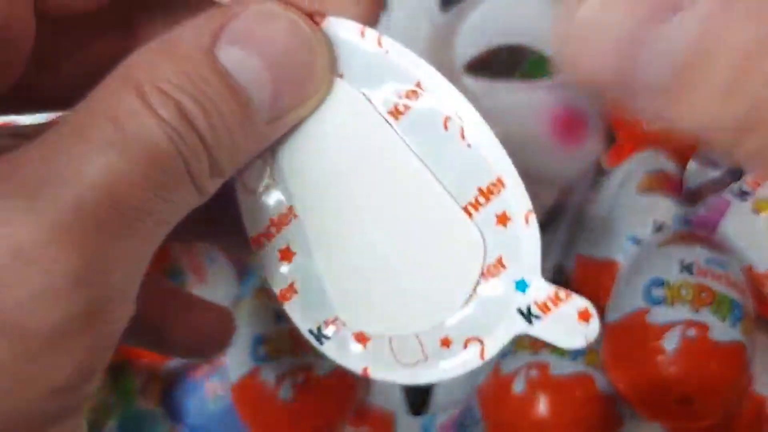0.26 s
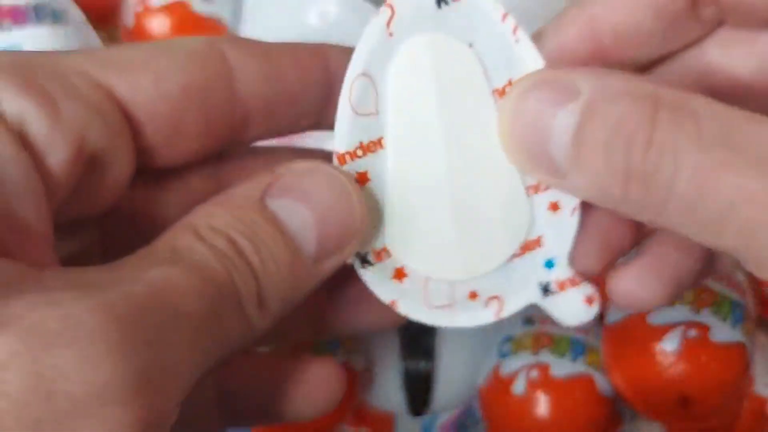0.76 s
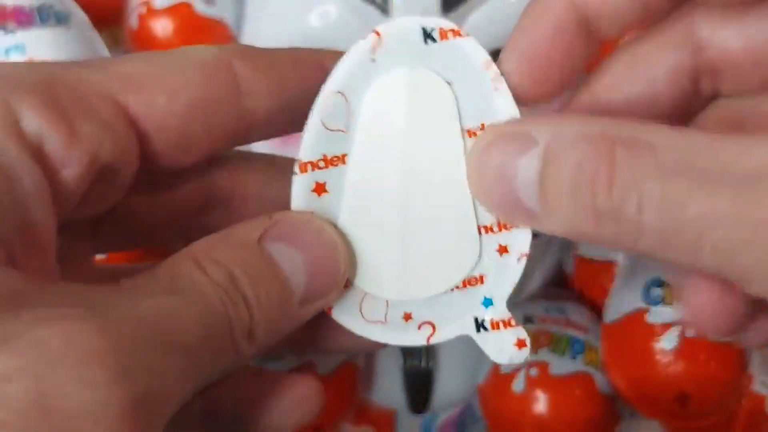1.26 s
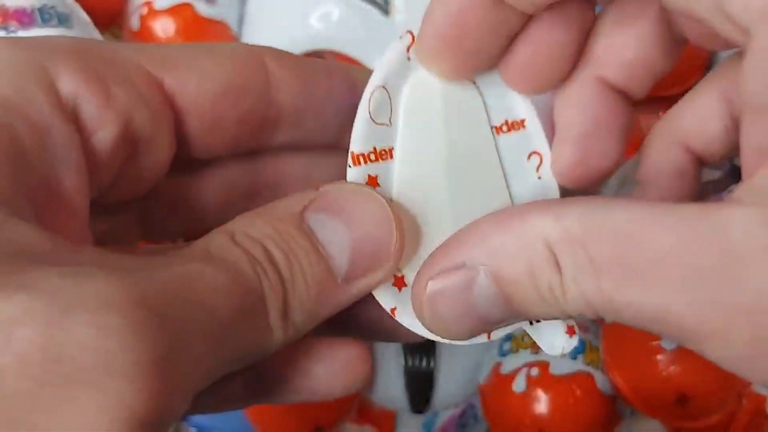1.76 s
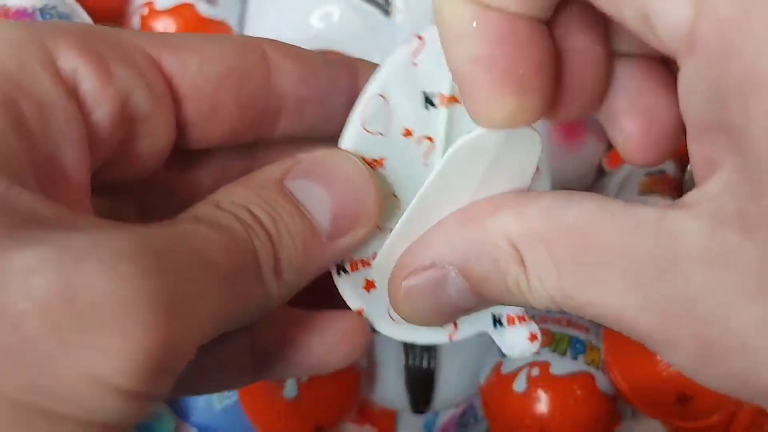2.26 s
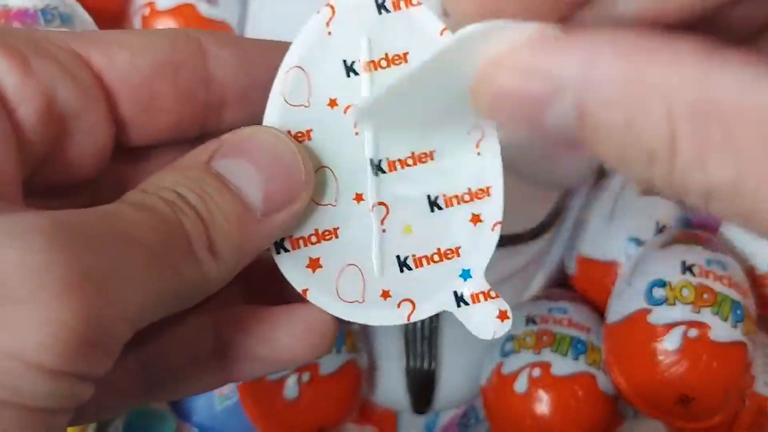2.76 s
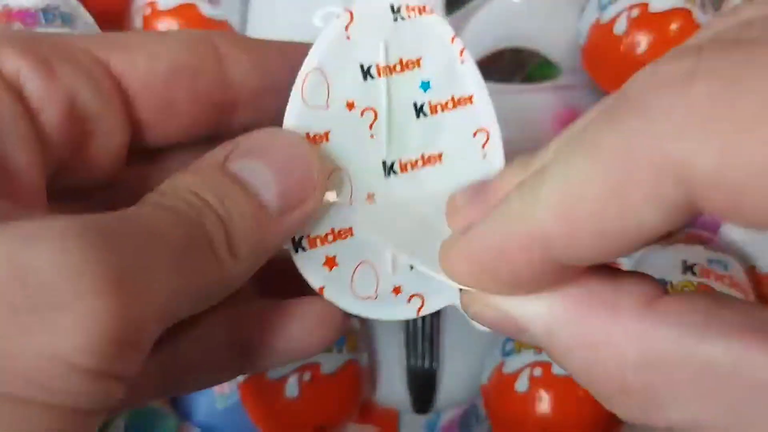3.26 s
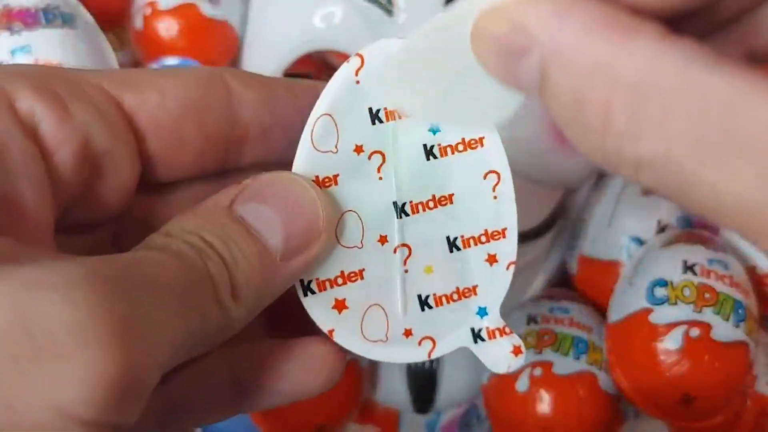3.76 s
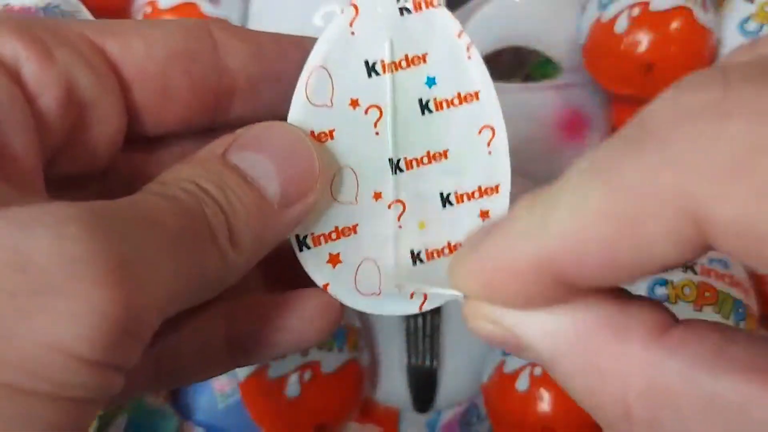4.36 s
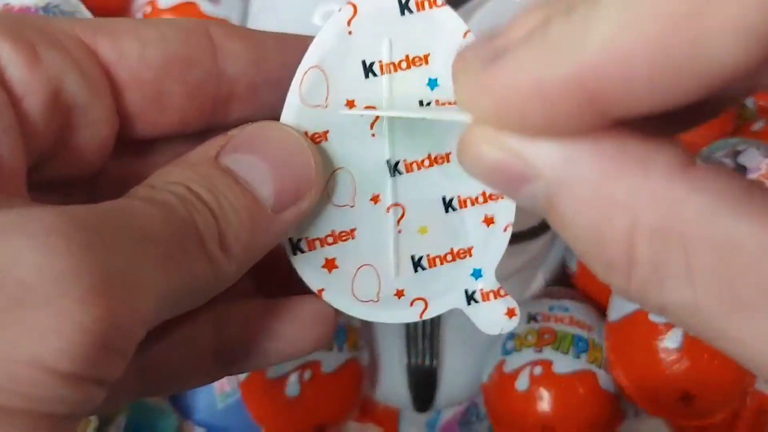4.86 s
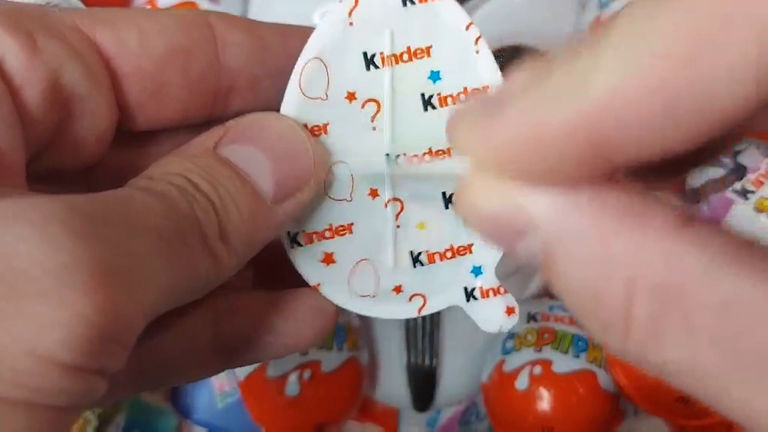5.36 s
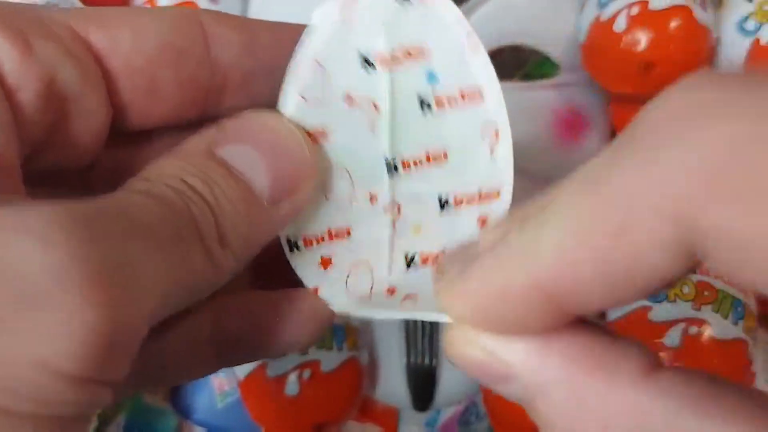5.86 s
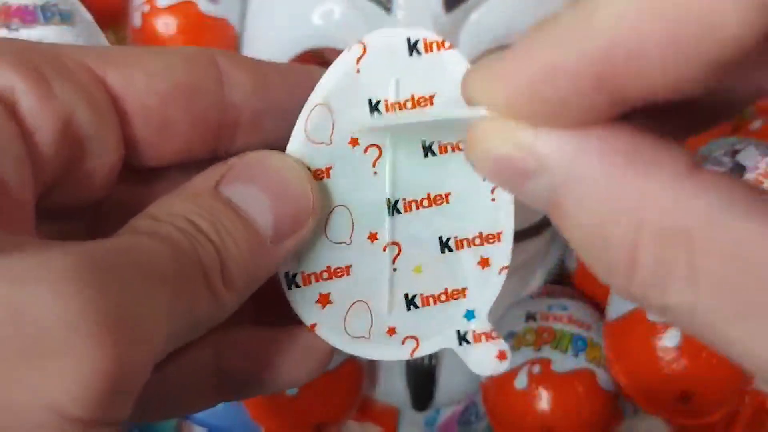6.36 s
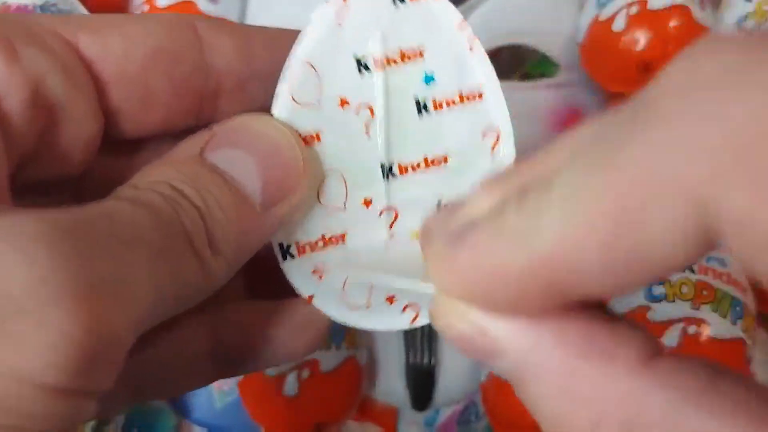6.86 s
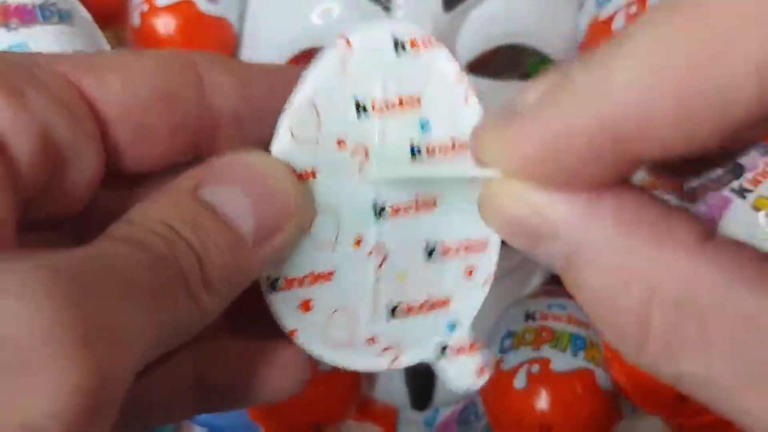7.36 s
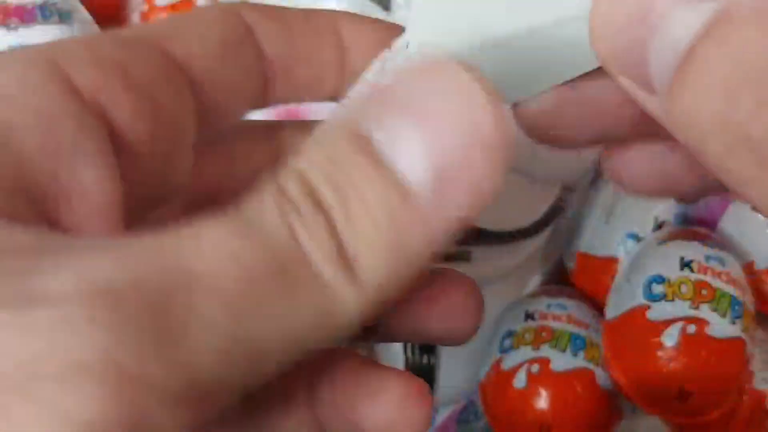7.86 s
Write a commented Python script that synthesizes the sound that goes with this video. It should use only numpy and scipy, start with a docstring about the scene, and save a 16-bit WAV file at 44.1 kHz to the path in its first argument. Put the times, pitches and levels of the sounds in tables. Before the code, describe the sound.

A flat plastic spoon is peeled off a foil lid with sharp crackles, then its edge scrapes the taut foil in quick, hollow, scratchy strokes.

```python
"""Foil lid of a sweets tub in a quiet room, small microphone close by, faint air noise and mains hum throughout.
First, fingers peel a flat plastic spoon off the lid: slipping grains rub, brief bursts ring the lid and film
as snaps, and dense slips through one broad resonance creak. Then short strokes drag and flick the spoon's
edge over the taut foil, among more snaps; a last light rub ends it. Sparse decaying taps make the room tail.
The recorder samples coarsely, so the treble mirrors weakly about 8 kHz."""
import sys
import numpy as np
from scipy import signal
from scipy.fft import rfft, irfft, next_fast_len
from scipy.io import wavfile
from scipy.ndimage import uniform_filter1d

SR = 44100
rng = np.random.default_rng(int(sys.argv[2]) if len(sys.argv) > 2 else 0)


def persist_wave(psi):
    """Save psi, clipped to +-1, as 16-bit WAV."""
    counts = np.round(np.clip(psi, -1, 1) * 32767).astype(np.int16)
    wavfile.write(sys.argv[1], SR, np.atleast_2d(counts).T)


def amplitude_ratio(level_db):
    """Convert a level in decibels to the matching linear amplitude (field) ratio."""
    exponent = np.asarray(level_db, float) / 20
    return 10 ** exponent


N = 358091

# Drum modes of the lid, before touch widens them: centre_hz, width_hz, relative_db
LID_MODES = [(296, 420, -14.5), (750, 204, -5.5), (968.6, 99, -4.5), (1295.6, 180, -4), (1858, 110, -10)]
# Modes of the thin foil film, before touch widens them: centre_hz, width_hz, relative_db
FILM_MODES = [(2650, 285, 4), (3350, 178, 5), (4298, 381, 4), (4690, 340, 2.5), (5625, 290, 2),
              (5940, 190, 3), (6910, 970, 2)]
# Contact in each handling spell, last row for all strokes:
# grittiness (0-1), hiss_under_3500_hz_db, drum_share_db
CONTACT_ROWS = [(0.35, -2.5, -7), (0.53, -11, -11.5), (0.63, -5.5, -11.5), (0.4, -0.5, -0.5),
                (0.6, -0.5, -4), (0.76, 0, -6.5), (0.71, -2.5, -8), (0.68, -1.5, -5), (0.77, 1.5, -4.5)]


def evened(x):
    """Scales to rms 1."""
    return x / np.sqrt(np.mean(x ** 2) + 1e-20)


def read(points, hz):
    """Reads a (Hz, value) curve on a log-frequency axis."""
    f, value = np.transpose(points)
    return np.interp(np.log(hz + 1), np.log(f + 1), value)


def colour(x, points):
    """Filters by a (Hz, dB) spectrum."""
    size = next_fast_len(len(x))
    gain = amplitude_ratio(read(points, np.fft.rfftfreq(size, 1 / SR)))
    return irfft(rfft(x, size) * gain, size)[:len(x)]


def background():
    """Faint coloured air noise under steady mains hum and its octave."""
    # Colour of the air noise: frequency_hz, relative_db (per Hz)
    air_tone = [(29, -27), (50, 4), (450, -11.5), (923, -13.5), (6050, -26), (7800, -27), (10100, -42.5),
                (17200, -120)]
    # Mains hum: frequency_hz, level_db (rms)
    hum_tones = [(59.2, -92.5), (118.4, -83.5)]
    t = np.arange(N) / SR
    hum = 0
    for hz, db in hum_tones:
        hum = hum + amplitude_ratio(db) * np.sqrt(2) * np.sin(2 * np.pi * (hz * t + rng.random()))
    air = evened(colour(rng.standard_normal(N), air_tone))
    return amplitude_ratio(-76.5) * air + hum


def ring(modes, extra_db, t, damping):
    """Impulse response of decaying modes of alternating sign; touch widens them by the damping factor."""
    hz, width, db = np.transpose(modes)[:, :, None]
    width = width * damping
    sign = (-1.) ** np.arange(len(modes))[:, None]
    decay = np.exp(-np.pi * width * t)
    return (sign * width * amplitude_ratio(db + extra_db) * decay * np.sin(2 * np.pi * hz * t)).sum(0)


def wandering(drive, modes, shift_db=5.0, damping=2.15):
    """The contact point moves, so the modes are fed in changing strengths: three bodies take turns."""
    short = np.arange(800) / SR
    turn = np.arange(len(drive)) / SR * 45 + np.arange(3)[:, None] * np.pi / 3  # 45 rad/s
    shifts = shift_db * rng.standard_normal((3, len(modes)))
    bodies = np.array([ring(modes, shift[:, None], short, damping) for shift in shifts])
    bodies /= np.linalg.norm(bodies, axis=1, keepdims=True)
    feeds = drive * np.cos(turn) ** 2 * 2 / 3
    return signal.fftconvolve(feeds, bodies, axes=1).sum(0)


def catches(count, per_s, size_db):
    """Sparse larger slips: the edge catches on a crease and lets go in a short ragged burst."""
    when, size = rng.random((2, count))
    train = (when < per_s / SR) * amplitude_ratio(-size_db * np.log(size + .02))
    burst = np.exp(-np.arange(200) / SR / 0.00083)  # decay time in s
    return np.convolve(train, burst)[:count] * rng.standard_normal(count)


def slow_noise(count, size):
    """Twice-smoothed noise of rms 1; size is the smoothing span in samples."""
    noise = uniform_filter1d(rng.standard_normal(count), size=size)
    return evened(uniform_filter1d(noise, size=size))


def rubbing(rows, grit, low_db, drum_db, grains_per_s=900, size_db=4, flutter_db=3, rise_s=0.0015,
            catch_db=4, knock_db=6):
    """Tiny slips in clumps over a smooth slide excite the film (hiss) and the lid (rumble)."""
    s, db = np.transpose(rows)
    t = np.arange(s[0], s[-1], 1 / SR)
    count = len(t)
    pressure = amplitude_ratio(np.interp(t, s, db)) * (1 - np.exp((s[0] - t) / rise_s)) ** 2
    when, sign, size = rng.random((3, count))
    grains = (when < grains_per_s / SR) * np.sign(sign - .5) * amplitude_ratio(-size_db * np.log(size + 0.031))
    grains = evened(grains)
    clumps = slow_noise(count, 250)
    surges = 4.03 * slow_noise(count, 700)  # dB at full grit: the hand pushes unevenly
    grit = np.clip(grit, 0, 1)
    slide = np.sqrt(1 - grit ** 2) * rng.standard_normal(count)
    drive = (grit * grains + slide) * amplitude_ratio(flutter_db * grit * clumps + grit * surges)
    ticks = amplitude_ratio(catch_db) * catches(count, per_s=70, size_db=2)
    knocks = amplitude_ratio(knock_db) * catches(count, per_s=38, size_db=4.0)
    film = wandering(pressure * (drive + grit * ticks), FILM_MODES)
    film = colour(film, [(1200, -40.0), (2300, low_db), (3300, low_db), (3700, 0.0)])
    drum = wandering(pressure * (drive + grit * knocks), LID_MODES)
    return s[0], film + amplitude_ratio(drum_db) * drum


def handling():
    """Skin and spoon slide on the foil in spells of changing pressure, which drives the rubbing."""
    # One list a spell of sliding, pressure setting the drive: time_s, pressure_db
    spells = [
        [(0.0, -97), (0.069, -66), (0.149, -83), (0.4, -93), (0.419, -47), (0.468, -67.5), (0.525, -52),
         (0.784, -56.5), (0.82, -45.5), (0.899, -90)],
        [(0.899, -79), (0.97, -59.5), (0.99, -69), (1.035, -53.5), (1.077, -67), (1.131, -48), (1.179, -72)],
        [(1.179, -97), (1.207, -48.5), (1.266, -59.5), (1.28, -47), (1.29, -68), (1.31, -49), (1.335, -50.5),
         (1.365, -49.5), (1.375, -72), (1.45, -97)],
        [(1.49, -97), (1.52, -47), (1.58, -61.5), (1.6, -50), (1.67, -62.5), (1.69, -50.5), (1.747, -48.5),
         (1.795, -55), (1.81, -72.5), (1.885, -81), (1.913, -70.5), (2.1, -62), (2.12, -72)],
        [(2.12, -65), (2.184, -77), (2.198, -13), (2.214, -59), (2.244, -27), (2.29, -29), (2.3, -40.5),
         (2.467, -53), (2.512, -46.5), (2.611, -48), (2.761, -87.5), (2.875, -57), (2.899, -78)],
        [(2.937, -92), (2.953, -49), (3.019, -61.5), (3.123, -38.5), (3.277, -51), (3.319, -40.5), (3.427, -53),
         (3.451, -59.5), (3.488, -60), (3.553, -92)],
        [(3.553, -64), (3.695, -42.5), (3.914, -49), (3.946, -35), (3.995, -41), (4.01, -58), (4.045, -59.5),
         (4.146, -33.5), (4.189, -49), (4.494, -45), (4.534, -53.5), (4.55, -74), (4.62, -87)],
        [(7.55, -62), (7.628, -43), (7.682, -86), (7.73, -39.5), (7.762, -76), (7.79, -46.5), (7.901, -64.5),
         (7.949, -43), (8.11, -62)],
    ]
    return [rubbing(rows, *contact) for rows, contact in zip(spells, CONTACT_ROWS)]


def snaps(rise_s=.0003, burst_s=0.0015, lead=22, focus_db=10, scatter_db=3.0, damping=1.3):
    """A brief burst of slips rings the lid and the film; modes near the snap's own pitch ring loudest."""
    # Foil buckles or glue lets go, peaks before the sheet's radiation:
    # time_s, drum_peak_db, crackle_peak_db, drum_pitch_hz, crackle_centre_hz
    snap_rows = [(0.4132, -39, -43, 1860, 2660), (0.4896, -51, -44, 1280, 4330),
                 (0.499, -40.5, -39, 1310, 3430), (0.5191, -24.5, -10, 2310, 4170),
                 (0.819, -31.5, -28, 1770, 3430), (0.8255, -42, -27, 1110, 3145),
                 (1.2017, -37, -45, 630, 5900), (1.3057, -50, -38, 1810, 3620),
                 (1.36, -29, -26.5, 1500, 2650), (1.3646, -34, -25.5, 2000, 2640),
                 (1.5115, -38, -31.5, 930, 3460), (1.5554, -26, -18, 1340, 4990),
                 (1.5971, -49, -27.5, 1830, 4700), (1.7076, -33.5, -33.5, 1000, 2320),
                 (1.7392, -23.5, -26, 1100, 2310), (1.744, -29.5, -32.5, 1270, 2470),
                 (1.7562, -33, -44, 980, 3460), (1.9066, -31, -20.5, 2270, 5340),
                 (1.9837, -46, -56.5, 716, 2330), (2.0242, -26.5, -20, 1910, 2130),
                 (2.0421, -37.5, -27.5, 720, 4320), (2.0482, -32, -54, 930, 3270),
                 (2.1257, -24.5, -7, 1710, 4040), (2.132, -18, -11.5, 1820, 4280),
                 (2.1423, -20, -11.5, 2130, 5300), (2.1493, -13, -3, 1732, 3990),
                 (2.1709, -17.5, -15, 1985, 3945), (2.1927, -12.5, -8, 1000, 2270),
                 (2.1985, -4.5, -9.5, 2093, 5260), (2.2182, -23, -16, 1570, 6020),
                 (2.2221, -18.5, -7.5, 1750, 6020), (2.227, -27, -13, 1304, 6170),
                 (2.235, -12.5, -6, 1914, 5950), (2.2405, -19, -14, 1172, 4400),
                 (2.2535, -10, -4.5, 1013, 6100), (2.266, -20, -10.5, 960, 6180),
                 (2.2744, -14, -6.5, 970, 6200), (2.2869, -8.5, -13, 1250, 4180),
                 (2.2943, -12, -2, 1005, 4364), (2.458, -27, -37, 896, 2300),
                 (2.5055, -23.5, -28, 1900, 3680), (2.5123, -26.5, -13, 2160, 3200),
                 (2.5326, -19.5, -20.5, 1820, 2660), (2.542, -25.5, -28, 1220, 2320),
                 (2.582, -32, -42.5, 1290, 3220), (2.6088, -18, -20.5, 1290, 3870),
                 (2.7972, -56.5, -43, 1770, 3500), (2.951, -16.5, -25.5, 710, 2480),
                 (3.0775, -28, -30, 616, 5470), (3.1253, -20.5, -14.5, 1220, 2380),
                 (3.1687, -21, -18.5, 1190, 5430), (3.2583, -35.5, -24, 820, 2980),
                 (3.2889, -47, -21, 1660, 6800), (3.3513, -26.5, -21.5, 940, 2400),
                 (3.3664, -26.5, -20.5, 1170, 4160), (3.421, -29, -31, 1050, 2650),
                 (3.4317, -21.5, -29.5, 650, 2680), (3.5216, -33.5, -67.5, 1200, 2370),
                 (3.5936, -30.5, -41.5, 403, 2600), (3.622, -33.5, -43, 524, 2690),
                 (3.7228, -32, -35, 685, 5990), (3.7592, -21, -15.5, 1020, 2560),
                 (3.8137, -39, -33, 590, 3340), (3.8522, -20.5, -29, 910, 2620),
                 (3.8583, -22.5, -27.5, 1410, 2400), (3.867, -29, -46, 710, 2410),
                 (3.8823, -24.5, -45, 405, 3810), (3.9022, -27, -32, 1260, 2640),
                 (3.9406, -27, -25, 1270, 6420), (3.9482, -10, -10, 1390, 2650),
                 (4.0498, -26, -17, 870, 2900), (4.1464, -24, -11.5, 1440, 5300),
                 (4.163, -38, -25, 600, 7000), (4.1996, -23, -43, 656, 4260),
                 (4.2298, -16.5, -8.5, 1260, 4100), (4.2637, -20.5, -19.5, 1800, 2300),
                 (4.28, -28, -38, 418, 3870), (4.3829, -38.5, -20.5, 1670, 3930),
                 (4.4283, -22.5, -30, 1325, 2610), (4.4365, -27.5, -35, 552, 2380),
                 (4.4678, -33, -23, 666, 6540), (4.4952, -36, -26, 1190, 4220),
                 (4.5367, -35, -24, 690, 5010), (4.7517, -11.5, -13.5, 1726, 2560),
                 (4.7625, -20, -17.5, 590, 2360), (4.7902, -21.5, -28, 1253, 2345),
                 (4.795, -16.5, -14, 1310, 2570), (4.929, -21, -24, 600, 2440),
                 (4.961, -26, -27, 1420, 3240), (4.976, -22.5, -30, 1220, 3440),
                 (5.096, -19, -38, 660, 2480), (5.1152, -45, -15.5, 1030, 7150),
                 (5.141, -28.5, -43, 620, 2400), (5.2599, -16, -12, 570, 2620),
                 (5.3002, -28, -28.5, 1170, 3750), (5.3144, -19, -12.5, 750, 3280),
                 (5.4387, -11, -6, 1690, 3380), (5.4463, -26.5, -29, 1290, 3500),
                 (5.4696, -24.5, -24.5, 1200, 4300), (5.4892, -12.5, -15, 1210, 2420),
                 (5.502, -18, -25, 1320, 3210), (5.5889, -14.5, -12, 1270, 4100),
                 (5.6545, -18.5, -17.5, 920, 3460), (5.6656, -17.5, -24.5, 1360, 3140),
                 (5.752, -19.5, -26, 1220, 3600), (5.7587, -12, -15, 940, 2700),
                 (5.8002, -11.5, -18, 1285, 2670), (5.8204, -18.5, -18.5, 1330, 2703),
                 (5.9166, -19.5, -24, 1230, 4200), (5.9242, -21.5, -22, 1040, 3340),
                 (5.9506, -31.5, -21, 1180, 3840), (6.0014, -26, -35, 1370, 3000),
                 (6.0741, -16.5, -22.5, 1192, 3856), (6.092, -13, -22, 1248, 2720),
                 (6.1507, -13.5, -15.5, 1340, 3300), (6.2402, -12, -13, 1310, 2700),
                 (6.2636, -44, -13, 1070, 2610), (6.2902, -27.5, -23.5, 1080, 3210),
                 (6.2946, -18, -11.5, 1210, 5480), (6.379, -18.5, -41, 740, 2300),
                 (6.3936, -16.5, -17, 990, 2600), (6.4298, -22.5, -18.5, 605, 3700),
                 (6.4383, -18, -14, 1170, 2570), (6.507, -27, -30, 650, 3220),
                 (6.5229, -15, -24, 750, 3240), (6.556, -21.5, -45, 403, 4830),
                 (6.5753, -41.5, -37, 1240, 4040), (6.6387, -31.5, -37, 690, 2350),
                 (6.6445, -16.5, -33, 714, 2320), (6.6751, -25.5, -25, 1640, 3050),
                 (6.6857, -26.5, -39, 1030, 3450), (6.7983, -21.5, -19.5, 1120, 3520),
                 (6.8193, -22.5, -22.5, 1080, 2640), (6.8308, -16.5, -23.5, 1310, 2670),
                 (6.8788, -40, -43, 830, 3660), (6.913, -28, -35, 604, 2360), (6.9212, -11, -8, 1776, 3308),
                 (6.9707, -20.5, -20, 1280, 2400), (6.9798, -22, -22, 1344, 3190),
                 (7.0585, -44, -45, 1290, 3490), (7.2331, -11, -5.5, 983, 5520),
                 (7.2391, -17, -19, 1270, 3600), (7.257, -28.5, -28, 440, 3190),
                 (7.2838, -18, -19, 1248, 2420), (7.2995, -23, -35, 1220, 2360),
                 (7.3986, -17, -26, 1130, 2510), (7.41, -18, -23, 450, 6900),
                 (7.4638, -23, -14.5, 820, 5660), (7.4871, -9.5, -11, 1324, 3795),
                 (7.6314, -38.5, -28.5, 1370, 3860), (7.7041, -26, -34, 1144, 3450),
                 (7.7337, -40, -33, 1390, 3660), (7.9845, -35, -22.5, 1400, 4800),
                 (8.004, -36.5, -22.5, 1350, 4340), (8.04, -54, -29, 1274, 4610)]
    out, t = np.zeros(N + 1200), np.arange(600) / SR
    slips = rng.standard_normal((len(snap_rows), 600)) ** 3
    slips *= (1 - np.exp(-t / rise_s)) * np.exp(-t / burst_s)
    slips[:, 25] += lead * np.sign(slips[:, 25])  # one main release among the small slips
    lid_count = len(LID_MODES)
    luck = rng.standard_normal((len(snap_rows), lid_count + len(FILM_MODES)))
    for (s, drum_db, film_db, drum_hz, film_hz), burst, z in zip(snap_rows, slips, luck):
        lid = (LID_MODES, drum_hz, drum_db, z[:lid_count])
        film = (FILM_MODES, film_hz, film_db, z[lid_count:])
        sound = 0
        for modes, hz, db, chance in (lid, film):
            apart = np.log2(np.array(modes)[:, 0] / hz)  # octaves
            own = np.array(modes, float)
            own[np.argmin(abs(apart)), 0] = hz  # tension tunes the nearest mode to this snap's pitch
            weight = (scatter_db * chance - focus_db * abs(apart))[:, None]
            swell = 1 - np.exp(-t * hz * 4.4)  # lower pitches swell slower
            rung = np.convolve(burst, ring(own, weight, t, damping) * swell)
            sound = sound + amplitude_ratio(db) * rung / abs(rung).max()
        at = round(s * SR) - np.argmax(uniform_filter1d(sound ** 2, size=60))  # s marks the loudest moment
        out[at:at + len(sound)] += sound
    return out[:N]


def creak(start, length, db, hz):
    """Dense slips swell and fade through one broad resonance."""
    slips_per_s, width = 1300, 0.39  # width as a share of the pitch
    t, short = np.arange(0, length, 1 / SR), np.arange(300) / SR
    slips = (rng.random(len(t)) < slips_per_s / SR) * rng.standard_normal(len(t))
    body = np.exp(-np.pi * width * hz * short) * np.sin(2 * np.pi * hz * short)
    body *= 1 - np.exp(-short * hz)
    swell = np.sin(np.pi * (t / length) ** 1.2)
    return start, amplitude_ratio(db) * evened(np.convolve(slips * swell, body))


def creaks():
    """The stretched foil creaks now and then, each time at its own pitch."""
    # Creaks, level before the sheet's radiation: start_s, length_s, level_db (rms), pitch_hz
    creak_rows = [(0.805, .03, -46.5, 3220), (1.33, 0.049, -46, 2510), (1.725, 0.035, -41, 1220),
                  (2.24, .05, -29, 4400), (4.135, .035, -37.5, 3600)]
    return [creak(*row) for row in creak_rows]


def stroke(start, length, landing_db, drag_db):
    """Pressure of one stroke: the edge touches softly, bites in, drags, lifts, and the foil settles."""
    end, lifted_db = start + length, drag_db - 6  # the drag fades as the edge lifts
    return [(start, landing_db - 14), (start + 0.0049, landing_db), (start + 0.034, drag_db),
            (end, lifted_db), (end + .03, lifted_db - 23.5)]


def strokes():
    """The spoon's edge drags and flicks over the taut foil; each stroke's pressure drives the rubbing."""
    # Strokes of the edge, pressures setting the drive: start_s, length_s, landing_db, drag_db
    edge_strokes = [(4.742, 0.091, -25.5, -47.5), (4.922, 0.081, -30, -49), (5.087, 0.067, -38, -44),
                    (5.255, 0.072, -20, -43.5), (5.43, 0.077, -14, -41.5), (5.581, 0.098, -18.5, -41.5),
                    (5.751, 0.095, -23, -40), (5.916, 0.077, -31.5, -41.5), (6.067, 0.088, -22, -41),
                    (6.234, 0.078, -18.5, -37.5), (6.377, .074, -20.5, -46.5), (6.502, .075, -47, -46.5),
                    (6.639, 0.058, -38, -39.5), (6.788, 0.059, -29, -46.5), (6.91, 0.082, -31.5, -39),
                    (7.225, 0.09, -17.5, -36), (7.402, 0.096, -24, -44)]
    return [rubbing(stroke(*row), *CONTACT_ROWS[-1]) for row in edge_strokes]


def radiated(foil):
    """A small sheet radiates little bass."""
    # Radiation of the sheet: frequency_hz, gain_db
    sheet_gain = [(20, -41), (100, -6), (300, 1), (700, -0.88)]
    return colour(foil, sheet_gain)


def room(x):
    """Three tails of sparse taps, each band dying at its own speed, fed in turn as the hands move."""
    # Reverberation of the place: frequency_hz, t60_s
    decay_times = [(530, 0.28), (1390, 0.33), (3680, 0.3), (7000, 0.23)]
    # Colour of the lingering tail: frequency_hz, gain_db
    tail_tone = [(1300, 4), (2200, -2)]
    taps = np.zeros((3, SR // 2))
    starts = np.arange(200, SR // 2 - 20, 20)
    at = starts + rng.integers(0, 20, (3, len(starts)))
    np.put_along_axis(taps, at, rng.choice([-1., 1.], at.shape), 1)
    hz, t, z = signal.stft(taps, SR, nperseg=256)
    fade = amplitude_ratio(-60 * t / read(decay_times, hz)[:, None])
    tails = signal.istft(z * fade, SR, nperseg=256)[1]
    tails = tails / np.linalg.norm(tails[0])
    turn = np.arange(N) / SR * 7 + np.arange(3)[:, None] * np.pi / 3  # 7 rad/s
    feeds = colour(x, tail_tone) * np.cos(turn) * np.sqrt(2 / 3)
    return amplitude_ratio(-22.0) * signal.fftconvolve(feeds, tails, axes=1)[:, :N].sum(0)


def scene():
    """Foil sounds close to the microphone, their room tail and the background."""
    foil = snaps()
    for s, sound in handling() + strokes() + creaks():
        part = foil[round(s * SR):][:len(sound)]
        part += sound[:len(part)]  # adds into foil
    foil = radiated(foil)
    return (foil + room(foil) + background())[None]


def band_limit(x):
    """A steep low-pass at the top of the band."""
    return signal.sosfilt(signal.butter(12, 11330, fs=SR, output="sos"), x)


def record(dry):
    """Coarse sampling: the band is limited below the fold and a weak mirror image lies above it."""
    # Level of the mirrored treble: frequency_hz, gain_db
    mirror_gain = [(6000, -100), (8000, -2), (8500, -5), (9300, -13.5), (10300, -28), (11200, -51.5),
                   (12500, -140)]
    fold_hz = 8000
    band = colour(dry[0], [(6900, 0), (7500, -12), (fold_hz, -22), (8600, -40), (10000, -120)])
    # Multiplying by a tone at twice the fold reflects the spectrum about the fold
    image = 2 * band * np.cos(2 * np.pi * 2 * fold_hz * np.arange(N) / SR)
    mix = (band + colour(image, mirror_gain))[None]
    return band_limit(mix)


dry = scene()
out = record(dry)
persist_wave(out)
```